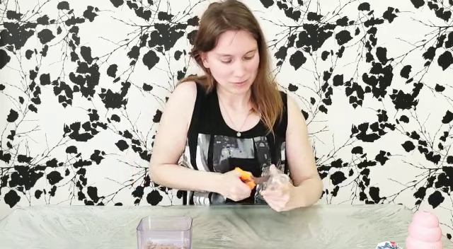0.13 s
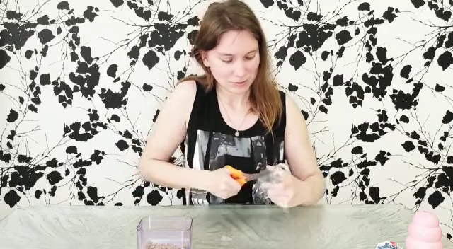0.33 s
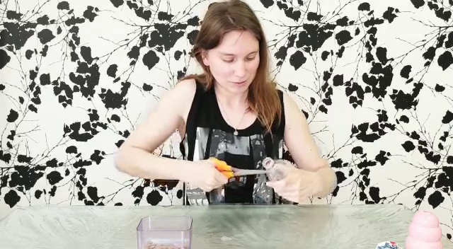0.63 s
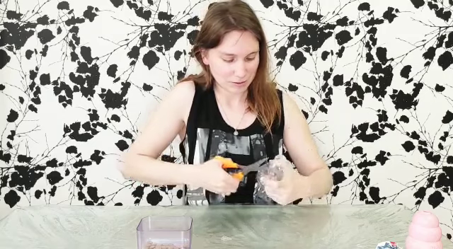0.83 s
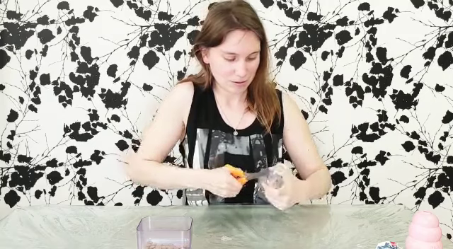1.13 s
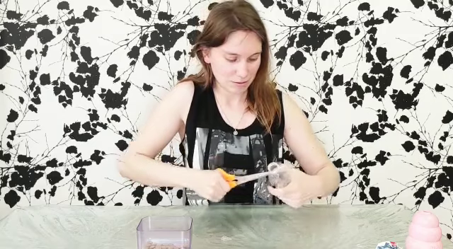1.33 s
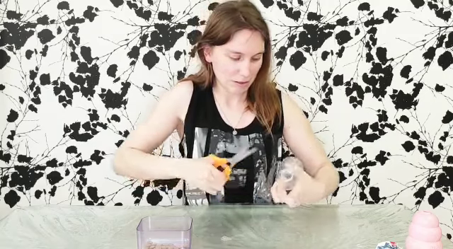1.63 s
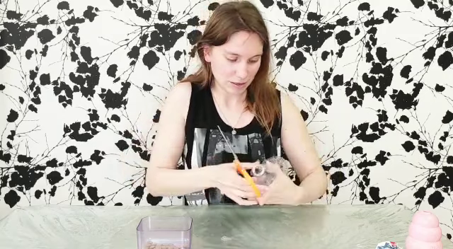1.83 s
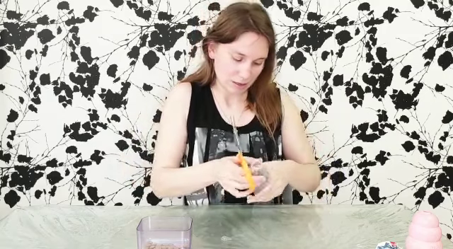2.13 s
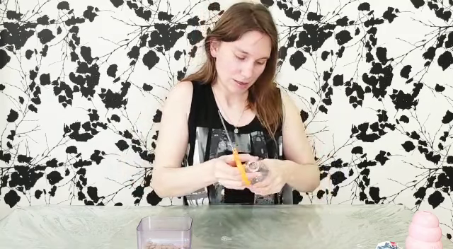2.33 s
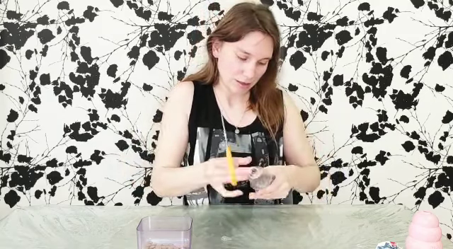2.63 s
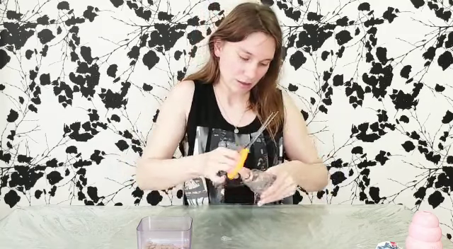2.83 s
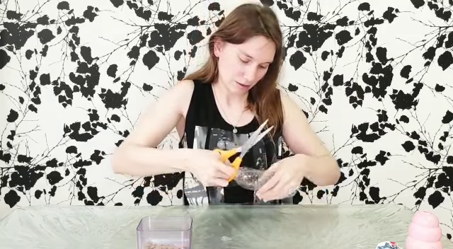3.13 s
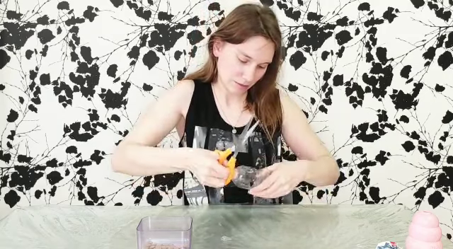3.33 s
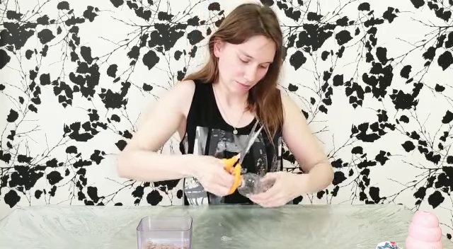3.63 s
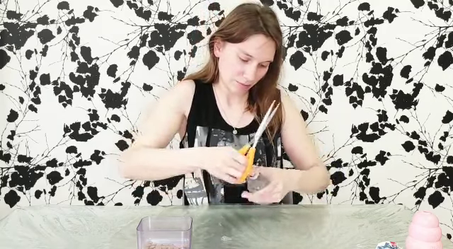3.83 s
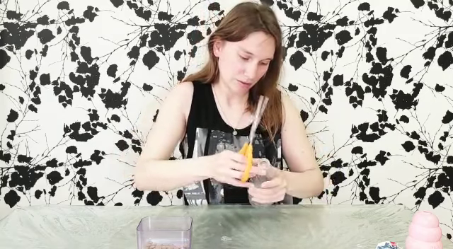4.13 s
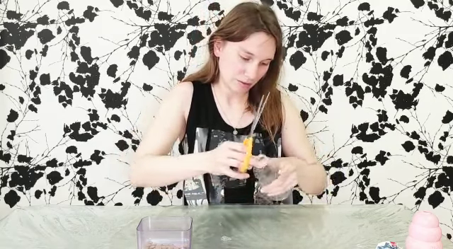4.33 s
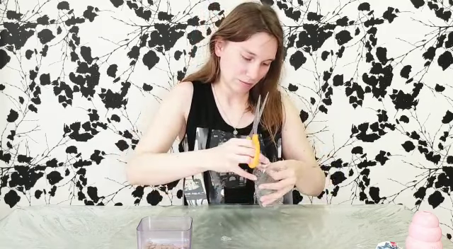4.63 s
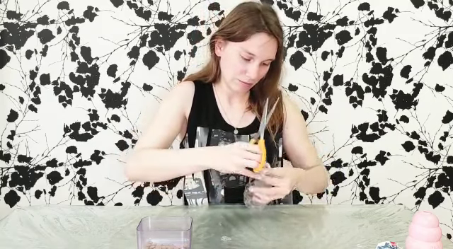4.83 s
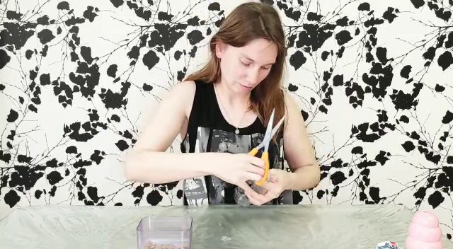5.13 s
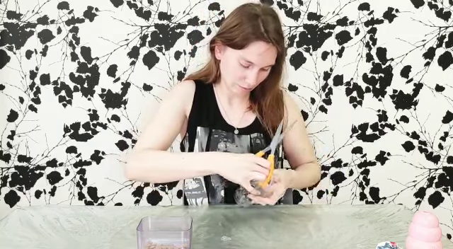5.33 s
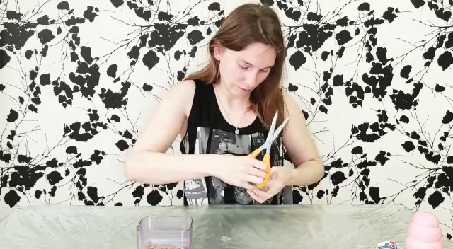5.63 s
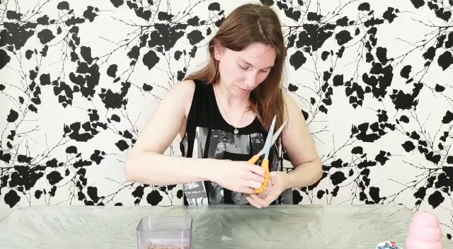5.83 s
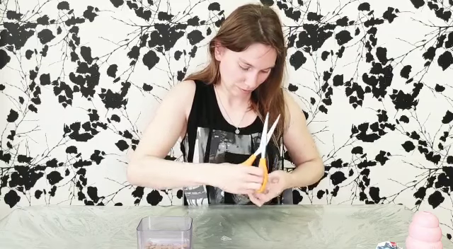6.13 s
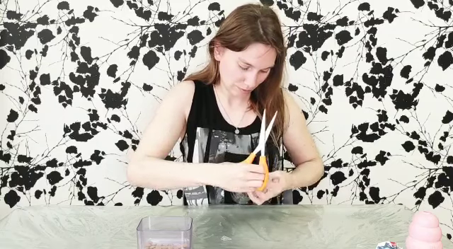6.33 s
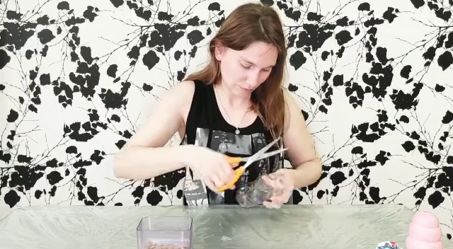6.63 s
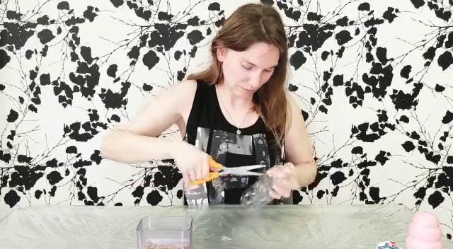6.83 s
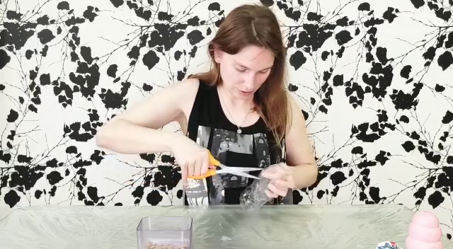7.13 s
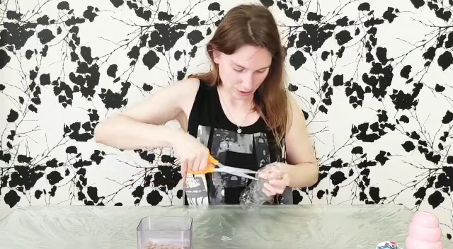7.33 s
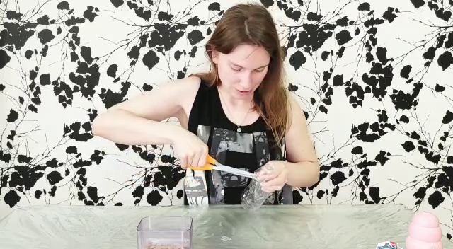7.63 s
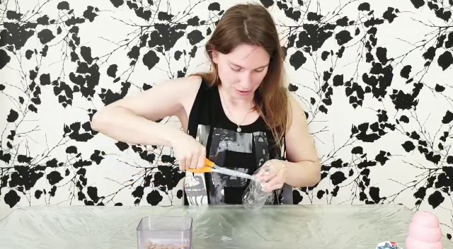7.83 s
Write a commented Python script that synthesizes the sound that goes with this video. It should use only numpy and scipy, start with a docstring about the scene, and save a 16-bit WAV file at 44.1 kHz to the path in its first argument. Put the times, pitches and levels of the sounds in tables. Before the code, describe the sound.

Thin, stiff plastic snaps and crackles under scissor blades in uneven bursts, its walls popping hollowly, in a quiet but reverberant room.

```python
"""A bare, echoing room, quiet but for its air and a faint mains hum; a thin plastic bottle is cut with scissors.
From the first stroke on, creases crackle as random clicks ringing the sheet, and creaks stick and slip.
Among them, all through, are snaps: noise bursts, each with a soft lead-in and trailed by a duller crack;
and hollow pops, which are ringing panels. Echoes follow each sound as decaying noise taps. The pair of sharply
resonant microphone ports belongs to a camera standing nearby, whose limiter catches the hardest peaks."""
import sys
import numpy as np
from scipy import signal
from scipy.fft import rfft, irfft
from scipy.io import wavfile
from scipy.ndimage import uniform_filter1d, minimum_filter1d

SR = 44100
rng = np.random.default_rng(int(sys.argv[2]) if len(sys.argv) > 2 else 0)


def int16_out(signal):
    """Quantize to a 16-bit WAV file."""
    q = np.round(np.clip(np.atleast_2d(signal).T, -1, 1) * 32767)
    wavfile.write(sys.argv[1], SR, q.astype(np.int16))


N = 352359  # length in samples


def amp(db):
    """Turns decibels into an amplitude factor."""
    return 10 ** (np.asarray(db) / 20)


def unit(x):
    """Scales a sound to energy 1."""
    return x / np.sqrt(np.sum(x ** 2) + 1e-20)


def read(points, hz):
    """Reads a spectrum on a log-frequency axis."""
    f, value = np.transpose(points)
    return np.interp(np.log(hz + 1), np.log(f + 1), value)


def add(mix, s, sound):
    """Mixes a sound into a stereo mix at time s."""
    part = mix[:, max(round(s * SR), 0):][:, :sound.shape[-1]]
    part += sound[..., :part.shape[1]]


def panned(x, lean_db):
    """Places a sound between left and right; a positive lean favours the left."""
    return x * amp([[lean_db / 2], [-lean_db / 2]])


def coloured(x, points, size=2048):
    """Causal filter with the given spectrum: nothing sounds before a click."""
    log_gain = np.log(amp(read(points, abs(np.fft.fftfreq(size, 1 / SR)))))
    minimum_phase = np.exp(np.conj(signal.hilbert(log_gain)))
    taps = np.fft.ifft(minimum_phase).real
    return signal.oaconvolve(x, taps[None], axes=1)[:, :N]


def whitened(x):
    """Evens out the spectrum of a short burst, so that it holds all pitches alike."""
    z = rfft(x)
    return irfft(z / np.sqrt(uniform_filter1d(abs(z) ** 2, size=9) + 1e-12))


# Spectrum of the empty room's air: pitch_hz, level_db (relative)
AIR_SPECTRUM = [(20, -13.5), (45, -6), (75, -24), (160, -4.5), (300, -11), (700, -12), (2000, -19.5),
                (10000, -44.5), (16000, -32)]
HUM_HZ, HUM_DB, AIR_DB = 98, -64, -51  # levels ahead of the ports


def background():
    """Quiet room air, partly shared by both sides, and a faint mains hum as a steady sine."""
    air = coloured(rng.standard_normal((2, N)) + rng.standard_normal(N), AIR_SPECTRUM)
    hum = np.sqrt(2) * np.sin(2 * np.pi * HUM_HZ * np.arange(N) / SR)
    return panned(amp(AIR_DB) * unit(air) * np.sqrt(2 * N) + amp(HUM_DB) * hum, lean_db=4.0)


def sheet_colour(hz, width_hz=320, gain=0.61, count=6):
    """Each spot of the sheet rings at a few pitches of its own."""
    pitches = np.exp(rng.uniform(np.log(900), np.log(6000), count))
    return 1 + sum(gain / (1 + 2j * (hz - f) / width_hz) for f in pitches)


# Strokes, in which the blades shear and the holding hand flexes the wall:
# start_s, end_s, shear_db (relative), grip_db (relative)
STROKES = [(-0.004, 0.34, -34.5, -52), (0.45, 0.54, -21.5, -73), (1.07, 1.105, -18.5, -26.5),
           (1.607, 1.688, -19, -31.5), (2.185, 2.24, -31.5, -36.5), (2.403, 2.507, -28, -33),
           (2.628, 2.847, -23.5, -66), (2.903, 3.123, -27.5, -39), (3.37, 3.58, -22.5, -31.5),
           (3.595, 3.827, -29.5, -34.5), (4.553, 4.9, -38, -41), (5.612, 5.664, -17, -31.5),
           (7.412, 7.69, -21.5, -41)]
# Bright spectrum of shearing and snapping plastic: pitch_hz, level_db (relative)
SNAP_SPECTRUM = [(60, -48), (270, -16.5), (430, -6.5), (1000, -6.5), (2000, -2.5), (3300, -3.5),
                 (8500, -4.5), (11000, -18.5), (15500, -15.5)]
# Duller spectrum of the wall flexing in the hand: pitch_hz, level_db (relative)
GRIP_SPECTRUM = [(100, -22), (260, -11.5), (400, 5), (900, 1.5), (3200, -5.5), (9000, -38.5)]
CREASES_PER_S, CREASE_SPREAD_DB, LARGEST_CREASE_DB = 140, 6.5, 10
# how often creasing moves to a new spot, how strongly a spot rings (gain), how much spots differ in strength
SPOTS_PER_S, SPOT_RING, LURCH_DB = 70, 2.6, 4


def crackle(strokes, colour, level_db, lean_db, fade_s=0.012, tear_s=0.00033, count=6, size=512):
    """Tiny creases tear during strokes, lurching from spot to spot, each with its own strength and ring."""
    crease_db = np.minimum(CREASE_SPREAD_DB * rng.exponential(1, N), LARGEST_CREASE_DB)
    strength = amp(crease_db) * (rng.random(N) < CREASES_PER_S / SR)
    lurch = np.cumsum(rng.random(N) < SPOTS_PER_S / SR)  # number of moves so far
    spot_strength = amp(LURCH_DB * rng.uniform(-1.6, 1, N))[lurch]
    # a push shared by both sides, plus a part that differs
    push = rng.choice([-1, 1], N) + .5 * rng.standard_normal((2, N))
    clicks = strength * spot_strength * push
    t, hz, rung = np.arange(N) / SR, np.fft.rfftfreq(size, 1 / SR), 0
    for spot in range(count):
        tear = whitened(rng.standard_normal(size) * np.exp(-t[:size] / tear_s))
        ring = unit(irfft(rfft(tear) * sheet_colour(hz, gain=SPOT_RING, count=2)))
        here = clicks * (lurch % count == spot)
        rung = rung + signal.oaconvolve(here, ring[None], axes=1)[:, :N]
    grains = unit(coloured(rung, colour)) * np.sqrt(2 * N)
    # full force inside a stroke, fading on either side
    force = sum(amp(db) * np.exp(-abs(t - np.clip(t, start, end)) / fade_s) for start, end, db in strokes)
    return panned(grains * force * amp(level_db), lean_db)


# The plastic creaks against the blade: start_s, length_s, level_db (relative), pitch_hz (at mid-creak)
CREAKS = [(0.024, 0.12, -30.5, 1290), (0.746, 0.054, -28.5, 1120), (0.859, 0.096, -19.5, 1680),
          (1.486, 0.026, -19, 1000), (1.617, 0.11, -16, 1130), (2.657, 0.048, -18.5, 1890),
          (3.602, 0.044, -15.5, 1450), (6.395, 0.12, -23.5, 730), (6.399, 0.018, -18, 2250)]
CREAK_DETUNE, CREAK_RISE = .045, .12  # shares of the pitch: random spread per slip, rise over the creak


def creaks(slips_per_s=220, uneven=0.35, spread_db=3, width_hz=170, fade_db=-7, size=1500):
    """Plastic sticks and slips on the blade; slips tap one panel, higher and weaker as the cut runs on."""
    out, t = np.zeros((2, N)), np.arange(size) / SR
    for start, length, db, hz in CREAKS:
        gaps, sizes, detunes = rng.standard_normal((3, 100))
        when = np.r_[0, np.cumsum(np.exp(uneven * gaps) / slips_per_s)]
        for s, louder, detune in zip(when[when < length], sizes, detunes):
            progress = s / length
            pitch_hz = hz * (1 + CREAK_DETUNE * detune + CREAK_RISE * (progress - .5))
            ring = np.sin(2 * np.pi * pitch_hz * t) * np.exp(-np.pi * width_hz * t)
            ring *= 1 - np.exp(-hz * t)  # the ring swells over its first cycle
            add(out, start + s, amp(db + spread_db * louder + fade_db * progress) * ring)
    return out


# Sharp snaps of blade and plastic: start_s, level_db (relative), body_db (added below the treble)
SNAPS = [(0.0972, -11, 0.5), (0.238, -16, 1), (0.296, -10, -1), (0.329, -8, 3.5), (0.4181, -5, -32),
         (0.488, -10.5, -7.5), (0.793, -2, 3), (0.808, 1, 5), (0.997, -1, 1), (1.316, -9.5, 2.5),
         (1.5114, 1, -2.5), (1.831, -26.5, 16.5), (2.039, -32.5, 14), (2.129, -27.5, 10.5),
         (2.2745, -11.5, 2.5), (2.299, -17, -6), (2.308, -0.5, -2), (2.331, -8.5, -2), (2.349, -8.5, -3),
         (2.364, -4.5, 3.5), (2.385, -14, 13), (2.3928, -0.5, -8), (2.46, -1, 0), (2.483, -7.5, -2),
         (2.51, -4.5, -24), (2.6557, -9, -4), (2.6774, -12, 8), (2.6912, 0, -20), (2.9522, -2.5, -21),
         (3.2206, -13.5, 11), (3.299, 1.5, -7), (3.3954, -4, 10.5), (3.497, -4.5, -22), (3.5217, -8, 5.5),
         (3.583, -14, 10), (3.67, -16, -1), (4.1307, -5.5, -0.5), (4.5041, -8.5, -9.5), (4.5336, -8.5, -2),
         (4.658, -7.5, 5.5), (4.7661, -5, -0.5), (4.999, -11.5, 2.5), (5.031, -11.5, 6), (5.1633, -14, 2.5),
         (5.354, 1, -7.5), (5.543, 0, -2), (5.6039, -5, -11), (5.9745, -5.5, 4), (6.141, -13.5, 5),
         (6.19, -3.5, -5), (6.2856, -4.5, -3.5), (6.2985, -5, -6), (6.398, -10.5, 3), (6.497, -11, -4),
         (6.555, -4.5, -10), (6.766, -13.5, -7), (6.9632, -20.5, 10.5), (7.175, -29, 7), (7.328, -3, -1.5),
         (7.4572, -19, 7), (7.504, -2, -2), (7.716, -2.5, -9.5), (7.92, -2.5, -8)]
LEAD_IN_S, LEAD_IN_DB = .003, -20  # mean lead and relative level of the soft lead-in
GIVE_S, GIVE_DB, GIVE_BODY_DB = .008, -17.5, 17  # mean lag, relative level and added body of the edge's crack
FLUTTER_S = .004  # decay time of the flutter


def cracks():
    """Each snap is a much weaker crack a few ms early, the sheet breaking, and the cut edge giving, duller."""
    for (s, db, body_db), (early, late) in zip(SNAPS, rng.uniform(.5, 1.5, (len(SNAPS), 2))):
        yield s - LEAD_IN_S * early, db + LEAD_IN_DB, body_db
        yield s, db, body_db
        yield s + GIVE_S * late, db + GIVE_DB, body_db + GIVE_BODY_DB


def snaps(level_db=12, tear_s=0.00055, vary=0.86, flutter_db=-20, body_hz=2800, top_hz=10000, size=1024):
    """A crack's noise swells and dies quickly and leaves the thin sheet fluttering."""
    out, t, hz = np.zeros((2, N)), np.arange(size) / SR, np.fft.rfftfreq(size, 1 / SR)
    fade = np.cos(np.pi / 2 * np.arange(size) / size)
    for s, db, body_db in cracks():
        run = t / (tear_s * np.exp(vary * rng.standard_normal()))
        shape = run * np.exp(1 - run) + amp(flutter_db) * np.exp(-t / FLUTTER_S)
        crack, slant = (whitened(burst) for burst in rng.standard_normal((2, size)) * shape)
        # short waves reach the two ports differently
        differ = hz / (hz + body_hz) * np.pi / 4
        z = rfft(crack) * np.cos(differ) + rfft(slant) * np.sin(differ) * [[1], [-1]]
        body = 1 + (amp(body_db) - 1) / (1 + (hz / body_hz) ** 4)
        # gentle snaps lack the highest treble, hard ones gain some
        top = amp((db + 9) * (1 - 1 / (1 + (hz / top_hz) ** 20)))
        sound = irfft(z * body * top * sheet_colour(hz)) * fade
        add(out, s, amp(db + level_db) * sound)
    return coloured(out, SNAP_SPECTRUM)


# Ways a buckling panel rings: pitch_ratio (multiple of its pitch), level_db (relative)
PANEL_MODES = [(0.622, -9), (0.998, 5.5), (1.28, 0), (1.9, -5.5)]
SAG = .12  # share of the pitch lost as tension goes


def flip(hz, ring_s=0.0023, sag_s=0.0022, rise_s=0.00079, size=1500):
    """A panel flips over and rings a few cycles, sinking in pitch as its tension goes."""
    t = np.arange(size) / SR
    turns = np.cumsum(hz * (1 + SAG * (np.exp(-t / sag_s) - .5))) / SR
    ring = sum(amp(db) * np.sin(2 * np.pi * (turns * ratio + rng.random())) for ratio, db in PANEL_MODES)
    return ring * np.exp(-t / ring_s) * (1 - np.exp(-t / rise_s))


# The wall buckles under the squeeze: start_s, level_db (relative), pitch_hz (middle of the sag)
POPS = [(0.237, -26, 1450), (0.283, -22.5, 1400), (0.809, -23, 990), (0.811, -12, 1590),
        (1.074, -19.5, 1010), (1.076, -22.5, 150), (1.079, -20, 480), (1.365, -32, 1010),
        (1.513, -17, 1006), (2.901, -30.5, 377), (2.902, -32.5, 2360), (3.05, -33, 800), (3.22, -21.5, 910),
        (3.259, -25, 363), (3.397, -14, 856), (3.401, -12.5, 548), (3.522, -19, 900), (3.731, -27, 1570),
        (3.768, -29, 1320), (3.818, -24, 854), (3.822, -27.5, 220), (4.5335, -22, 2140),
        (4.701, -28.5, 2520), (4.859, -22, 770), (5.028, -14, 550), (5.03, -19.5, 1450),
        (5.355, -28.5, 1280), (5.523, -20, 1210), (5.543, -17.5, 1120), (5.553, -17, 720),
        (5.975, -13, 1386), (6.289, -22, 675), (6.302, -25.5, 1370), (6.567, -25.5, 1280),
        (6.964, -22.5, 670), (7.485, -9, 973), (7.72, -15.5, 1415), (7.925, -18.5, 1990), (7.969, -23, 685)]
# every snap also jolts some panel, as hard as its body: relative level, middle pitch, spread either way
JOLT_DB, JOLT_HZ, JOLT_OCTAVES = -26, 1017, 0.784
NEIGHBOUR_DETUNE = .25  # largest log pitch step to a neighbouring panel, about a quarter


def buckles():
    """The wall buckles under the squeeze, and at every snap a panel is jolted too."""
    pitches = JOLT_HZ * 2 ** (JOLT_OCTAVES * rng.uniform(-0.99, 1, len(SNAPS)))
    return POPS + [(s, db + body_db + JOLT_DB, hz) for (s, db, body_db), hz in zip(SNAPS, pitches)]


def pops(level_db=6, lean_db=3.5, rattle_db=-12, rattle_s=.03, count=3):
    """Each buckle is followed by smaller flips of the neighbouring panels."""
    out = np.zeros((2, N))
    for s, db, hz in buckles():
        add(out, s, amp(db + level_db) * flip(hz))
        for delay, detune in rng.random((count, 2)):
            neighbour = flip(hz * np.exp(NEIGHBOUR_DETUNE * (2 * detune - 1)))
            add(out, s + rattle_s * delay, amp(db + level_db + rattle_db) * (1 - delay / 2) * neighbour)
    low_cut = signal.butter(2, 320, "high", fs=SR)
    return panned(signal.lfilter(*low_cut, out), lean_db)


# Decay of the bare room: pitch_hz, t60_s
ROOM_DECAY = [(150, 0.22), (500, 0.52), (1400, 0.51), (3700, 0.6), (8000, 0.52), (15000, 0.3)]
# Standing waves of the room: pitch_hz, boost_db
STANDING_WAVES = [(399, 3.5), (723, 4.5), (948, 5)]
# silence before the first echo, and time by which single echoes have merged
FIRST_ECHO_S, MERGE_S = .003, .25


def room_tail(spacing_s=0.001, build_s=0.00013, size=32768):
    """Reflections off bare walls thicken as they die; long waves reach both ports alike."""
    t = np.arange(size) / SR
    density = np.minimum(.02 + (t / MERGE_S) ** 2, 1)
    taps = rng.standard_normal((2, size)) * (rng.random((2, size)) < density) / np.sqrt(density)
    hz, when, z = signal.stft(taps, SR, nperseg=256)
    decay = amp(-60 * when / read(ROOM_DECAY, hz)[:, None])
    tail = signal.istft(z * decay, SR, nperseg=256)[1][:, :size]
    onset = 1 - np.exp(-np.maximum(t - FIRST_ECHO_S, 0) / build_s)
    a, b = rfft(tail * onset)
    hz = np.fft.rfftfreq(size, 1 / SR)
    same = np.sinc(hz * spacing_s)  # likeness of the two ports
    z = np.array([a, same * a + np.sqrt(1 - same ** 2) * b])
    z /= np.sqrt(uniform_filter1d(abs(z) ** 2, size=200) + 1e-12)  # even spectrum
    standing = 1 + sum((amp(db) - 1) / (1 + 1j * (hz - f) / 6) for f, db in STANDING_WAVES)
    return irfft(z * standing)


def room(x, count=4, places_per_s=2.361):
    """Reflections change as the hands move the bottle about: a steady crossfade round a few tails."""
    place = np.arange(N) / SR * places_per_s
    wet = 0
    for k in range(count):
        away = abs((place - k + count / 2) % count - count / 2)
        share = np.cos(np.pi / 2 * np.minimum(away, 1))
        wet = wet + signal.oaconvolve((x.mean(0) * share)[None], room_tail(), axes=1)[:, :N]
    return wet


def scene():
    """Sharp and hollow sounds of the bottle, their echoes and the quiet room."""
    shear = [(start, end, db) for start, end, db, _ in STROKES]
    grip = [(start, end, db) for start, end, _, db in STROKES]
    sharp = snaps() + crackle(shear, SNAP_SPECTRUM, level_db=-16.0, lean_db=7.5)
    hollow = pops() + creaks() + crackle(grip, GRIP_SPECTRUM, level_db=-2.0, lean_db=7.5)
    echoes = amp(6.0) * room(sharp) + panned(amp(3.5) * room(hollow), lean_db=3.0)
    return sharp + hollow + echoes + background()


# Left and right microphone port: resonance_hz, width_hz, gain_db (well below resonance)
PORTS = [(8787, 960, 1), (7610, 735, 1)]


def record(dry, size=14):
    """Each port rings at its own pitch, a quick limiter holds peaks under full scale, then the band limit."""
    hz = np.fft.rfftfreq(2 * N, 1 / SR)
    ports = np.array([amp(db) / (1 - (hz / f) ** 2 + 1j * hz * width / f ** 2) for f, width, db in PORTS])
    x = irfft(rfft(dry, 2 * N) * ports)[:, :N]
    allowed = 1 / np.maximum(1, abs(x))
    x = x * uniform_filter1d(minimum_filter1d(allowed, size), size)  # size in samples
    band_limit = signal.firwin(511, 16000, window=("kaiser", 8), fs=SR)  # low-pass, Hz
    return signal.oaconvolve(x, band_limit[None], "same")


dry = scene()
out = record(dry)
int16_out(out)
```